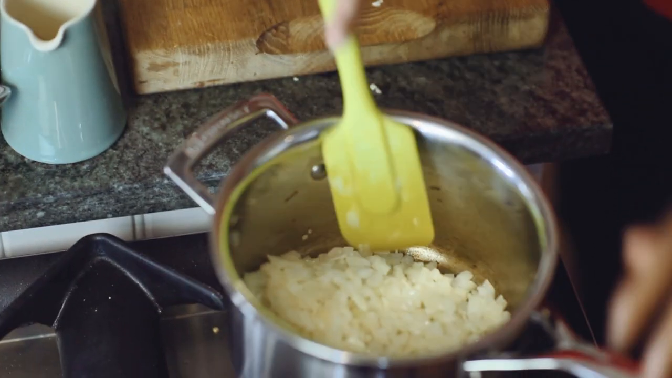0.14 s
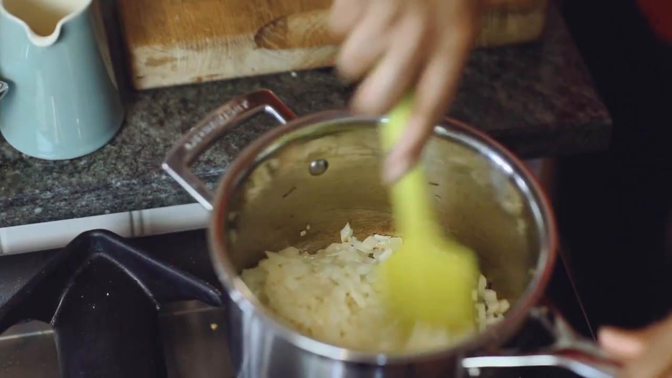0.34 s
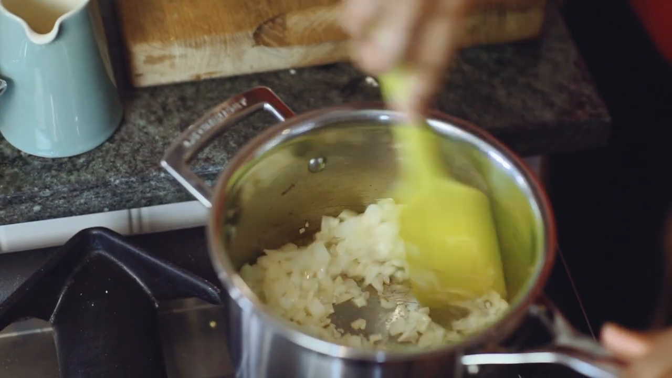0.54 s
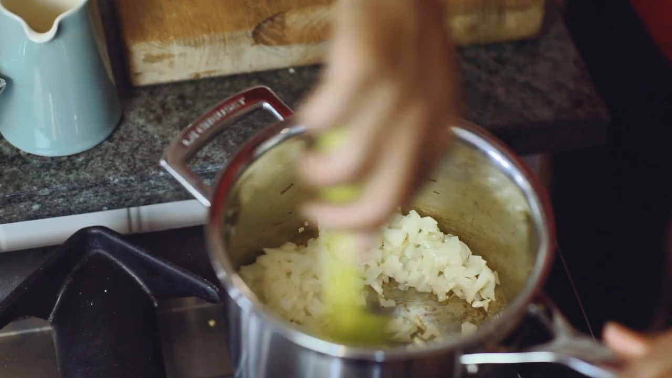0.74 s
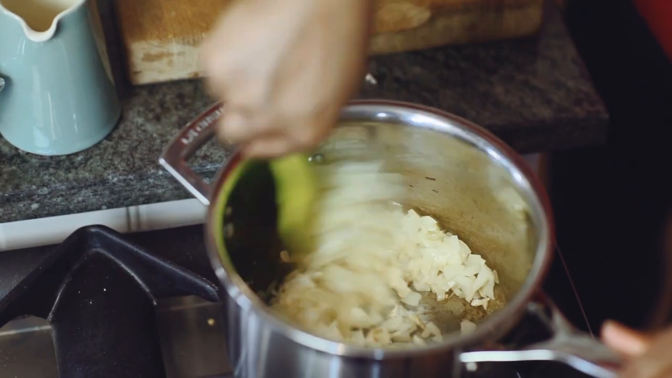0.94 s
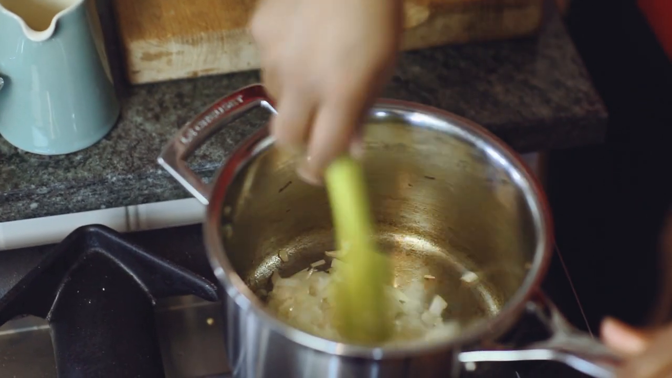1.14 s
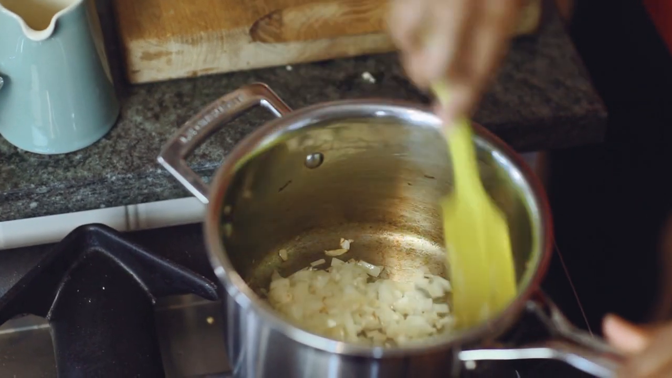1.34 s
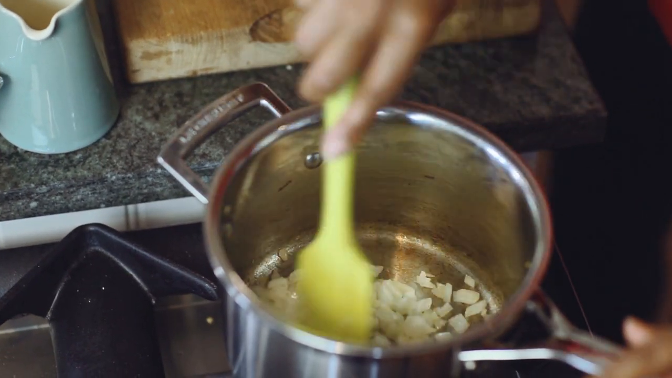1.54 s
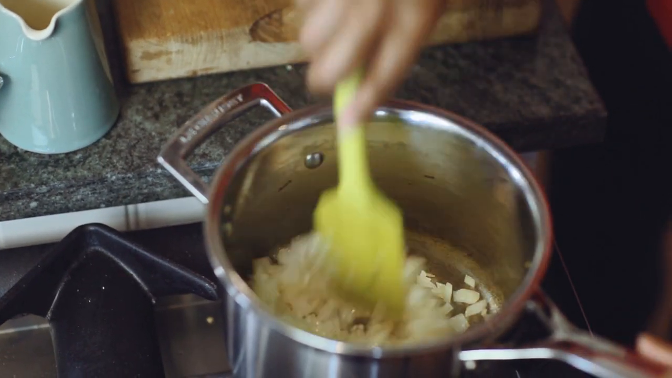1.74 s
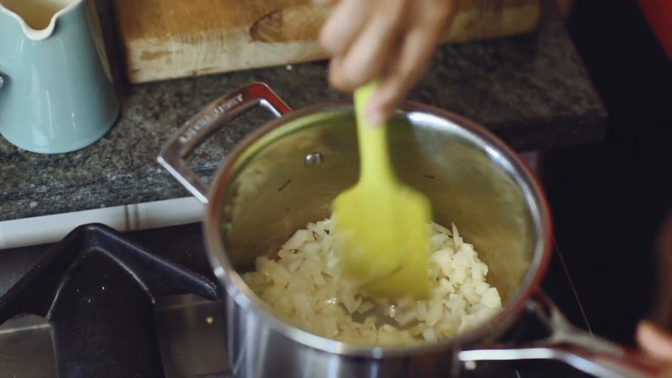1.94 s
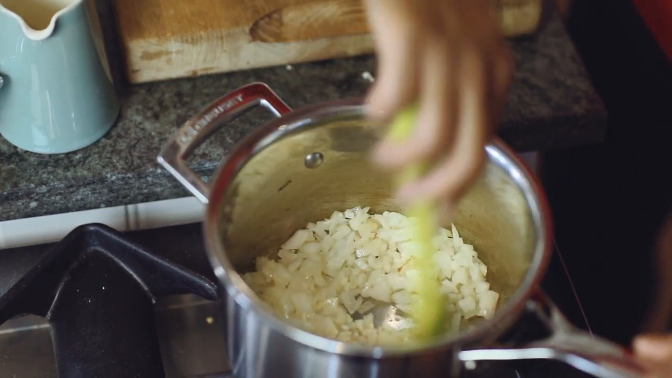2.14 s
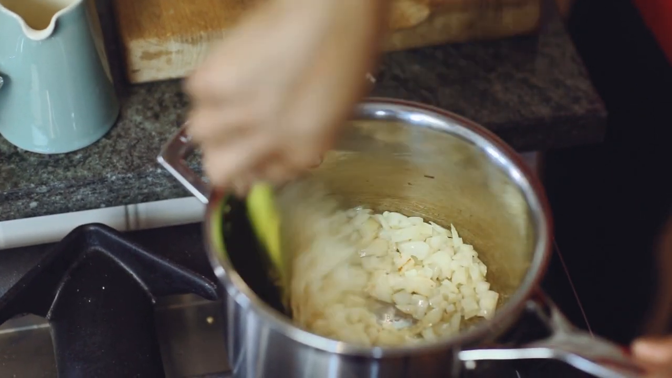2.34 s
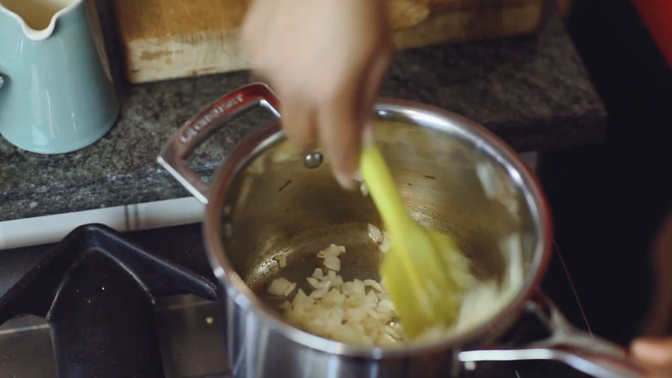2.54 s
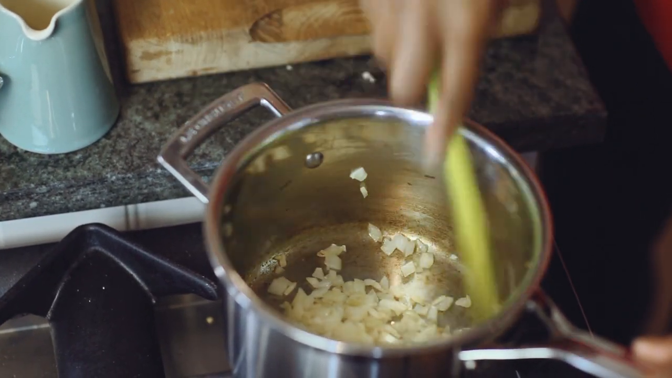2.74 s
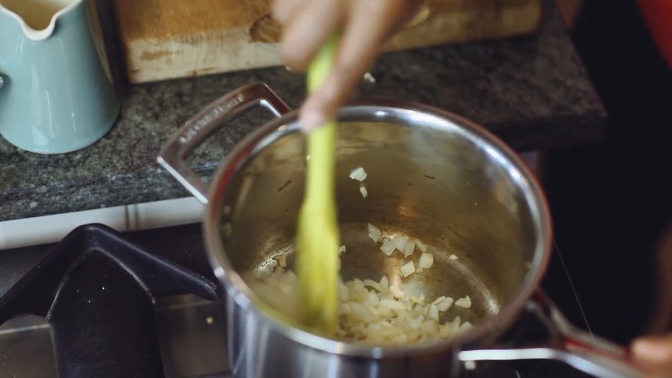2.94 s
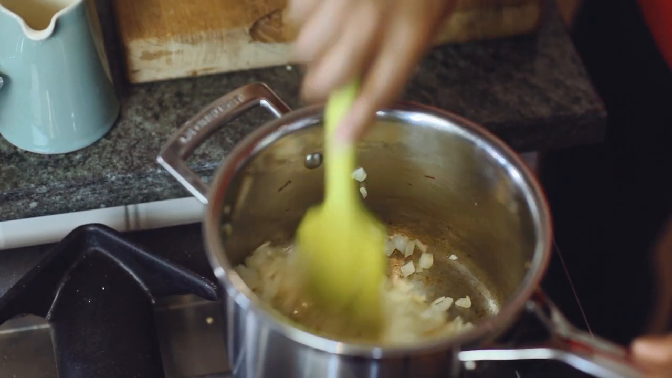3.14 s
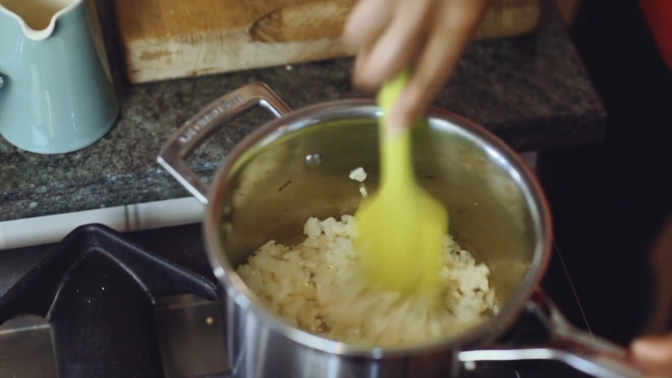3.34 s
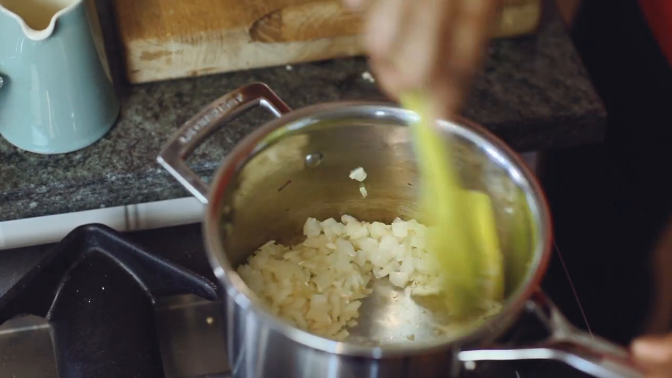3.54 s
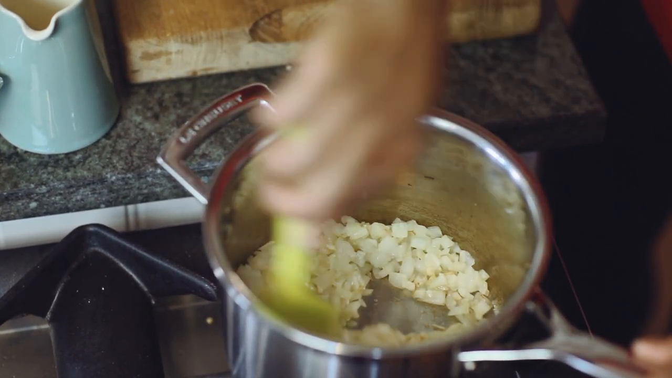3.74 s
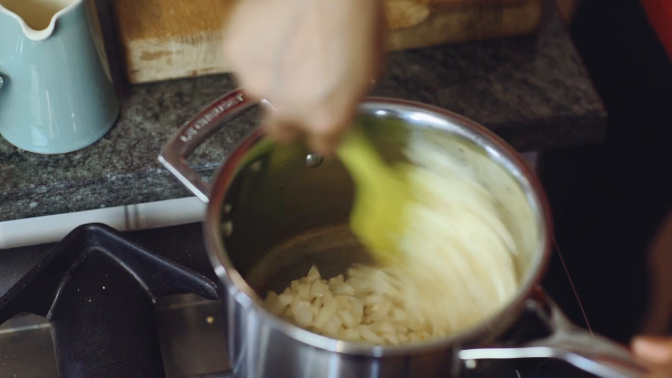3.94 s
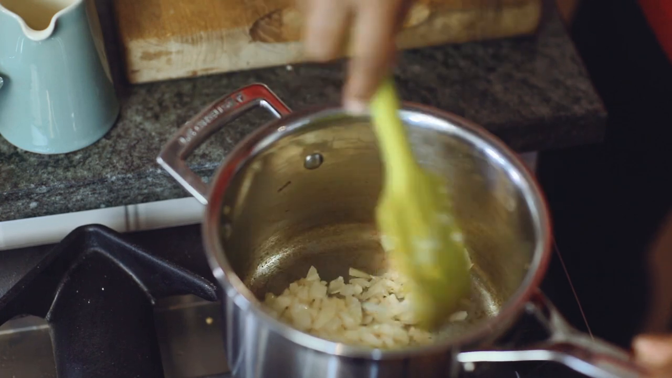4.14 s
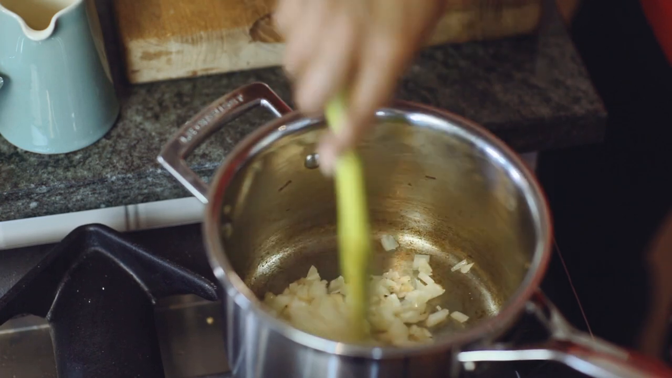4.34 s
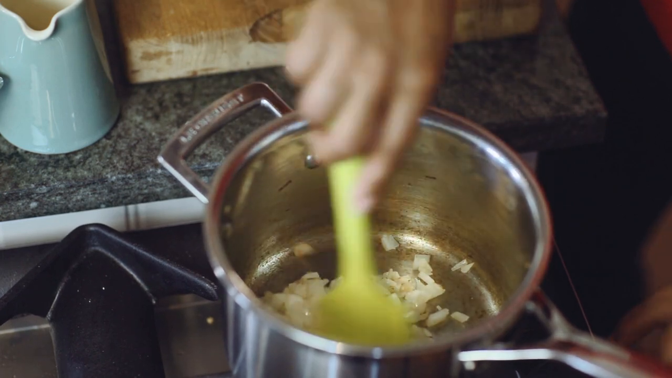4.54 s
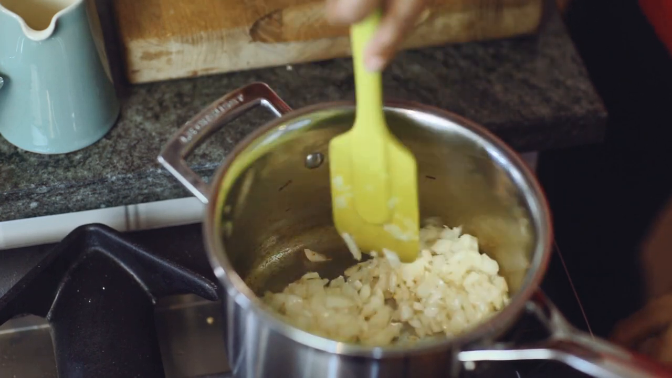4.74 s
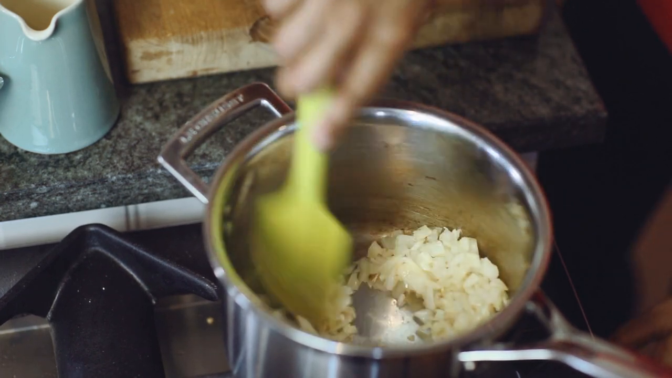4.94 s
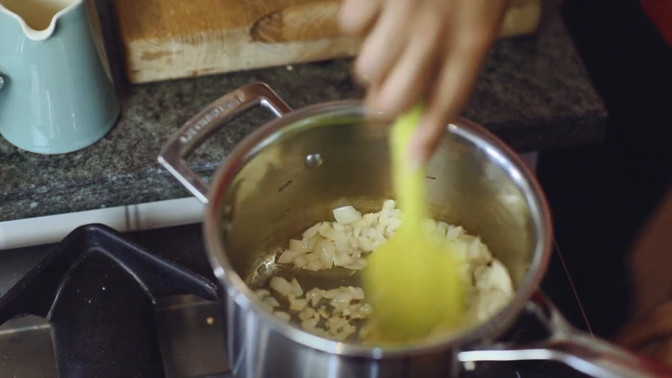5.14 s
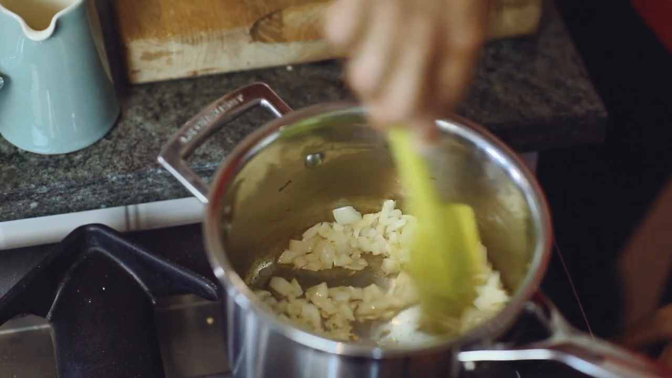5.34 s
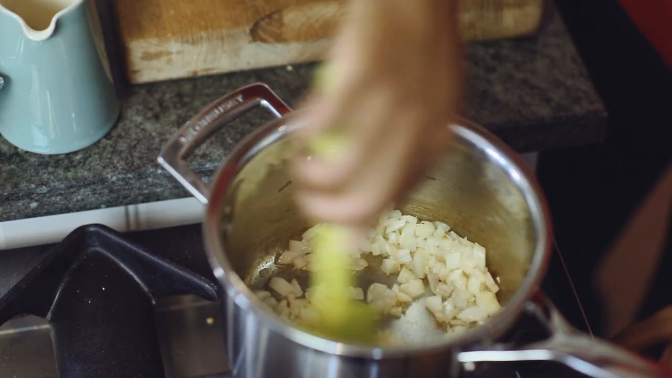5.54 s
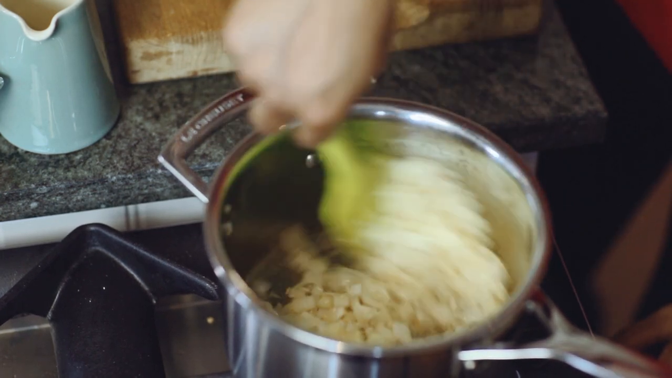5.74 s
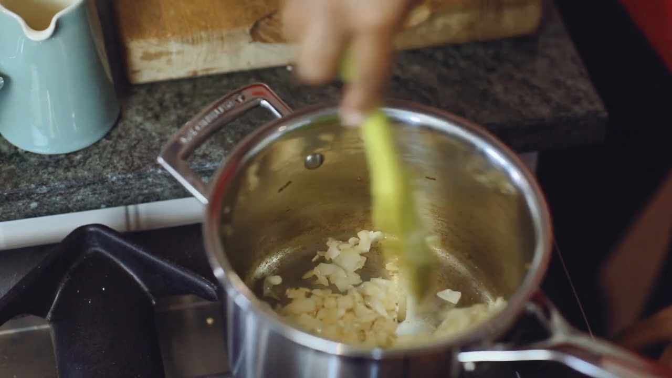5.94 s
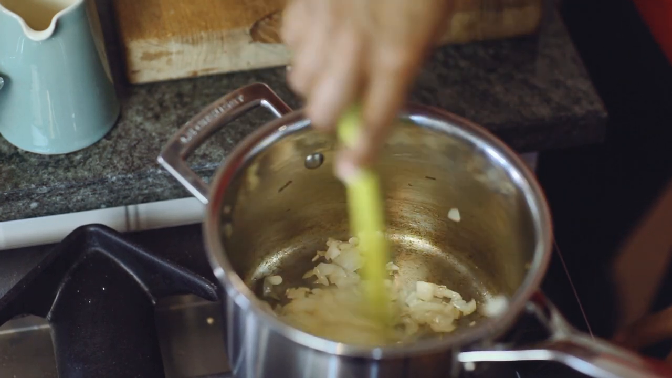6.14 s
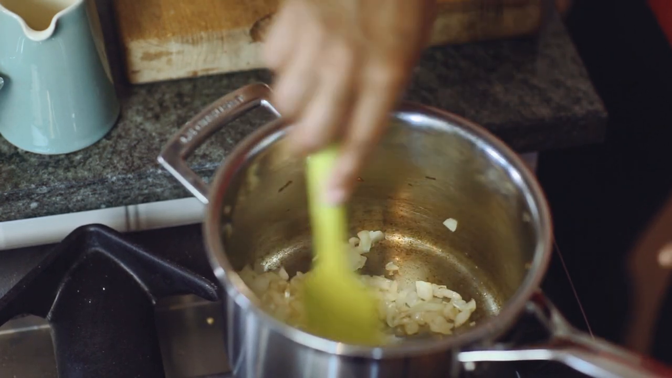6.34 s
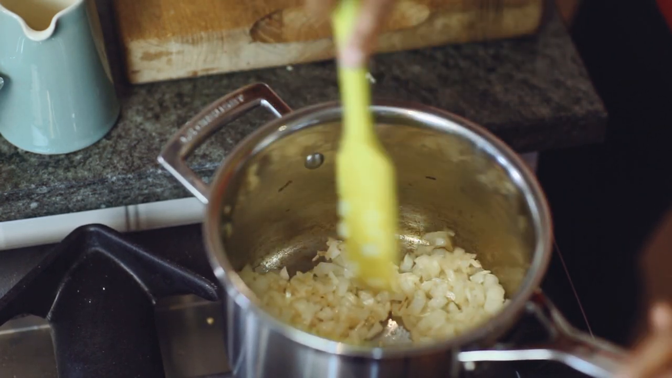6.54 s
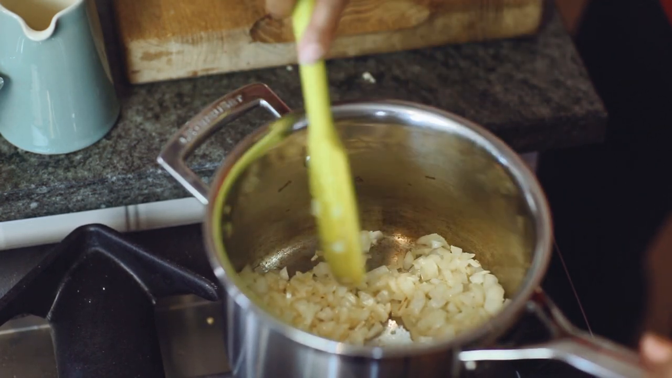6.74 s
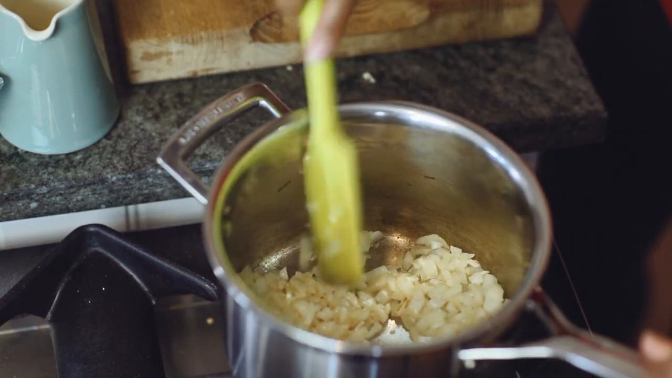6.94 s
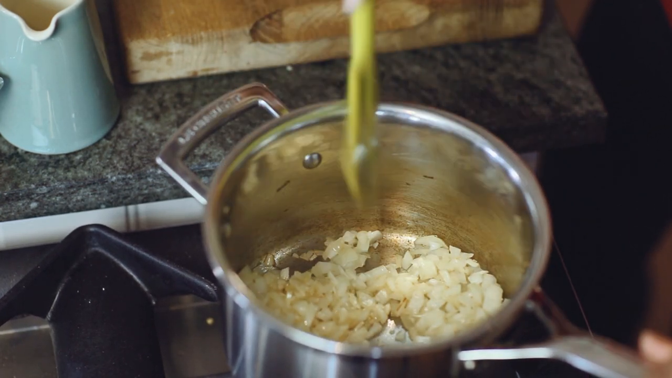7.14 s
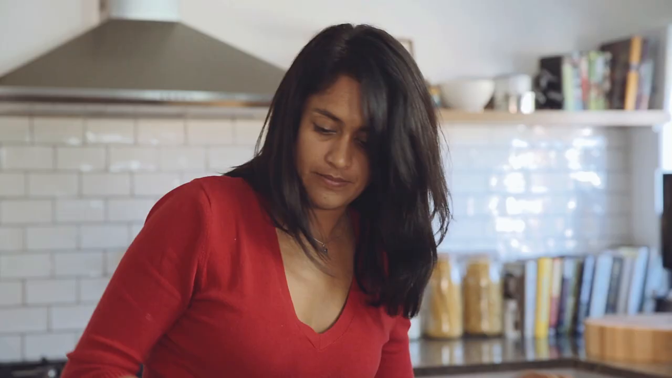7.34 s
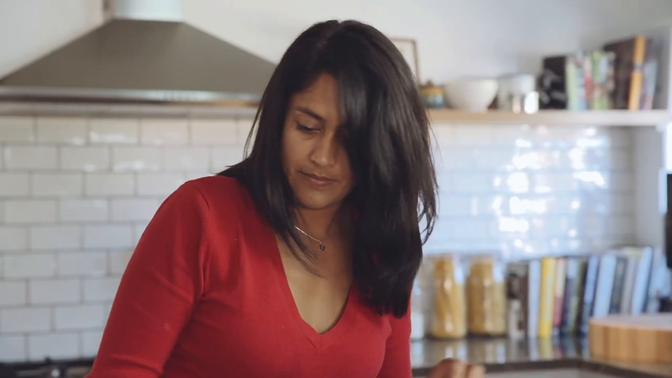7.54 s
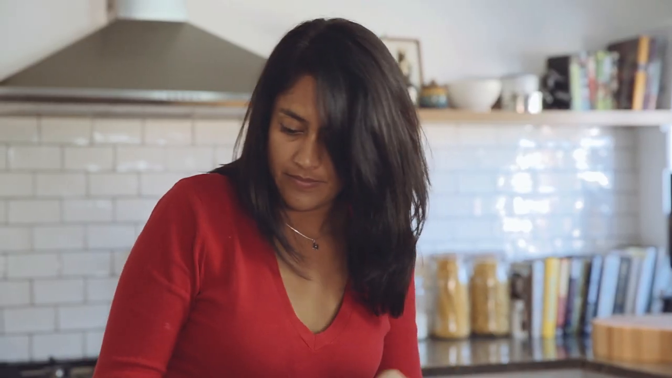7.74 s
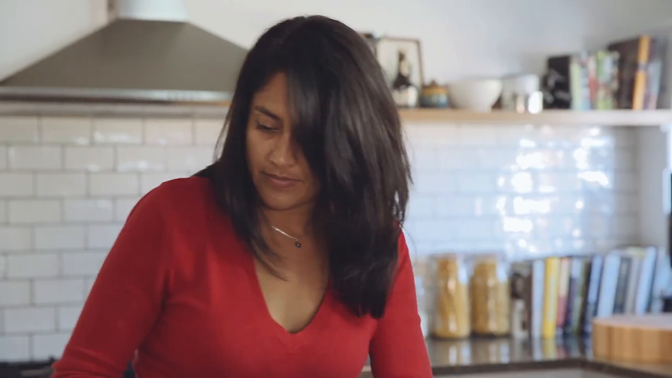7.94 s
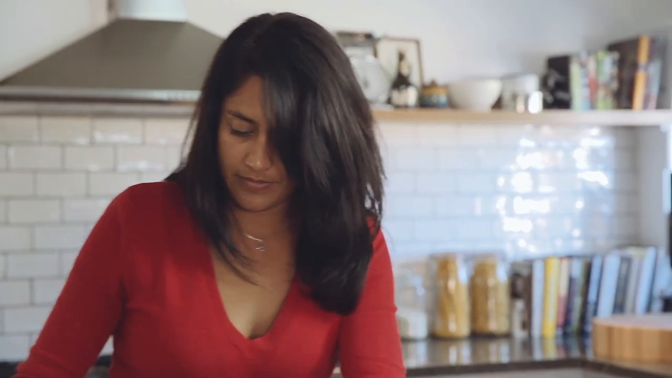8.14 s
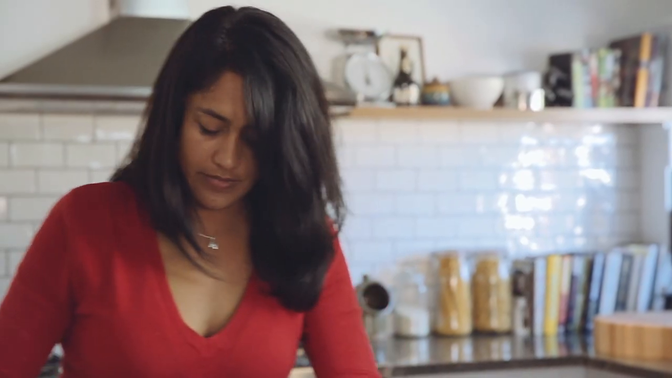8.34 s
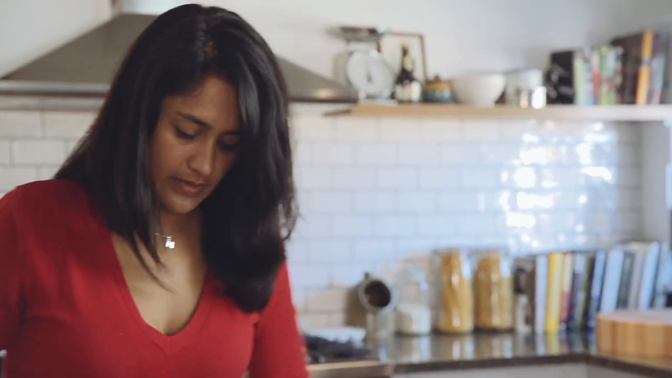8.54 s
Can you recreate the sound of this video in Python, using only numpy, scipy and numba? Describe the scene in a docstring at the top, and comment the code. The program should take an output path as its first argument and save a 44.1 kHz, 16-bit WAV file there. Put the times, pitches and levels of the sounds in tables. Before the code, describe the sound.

In a home kitchen, onions fry in oil in a deep steel saucepan. The sizzle swells quickly to a dense bright crackle, with sharp spits and soft, muffled spatula bumps on the pan. It gradually eases; near the end the spatula knocks the rim twice with a ringing metallic clatter, the frying fades and the spatula lands on the counter with a dull thud. Close single microphone, mono, faint low room air.

```python
"""In a kitchen, diced onions fry in oil in a deep steel saucepan, stirred with a soft spatula; one microphone.
Farthest back is the faint low air of the room and its dull reflections, made of shaped and fading noise.
The spatula bumps the pan, is knocked twice on its rim and laid on the counter: clicks set resonances ringing.
In front, steam bubbles burst in a dense sizzle of random clicks and noise, coloured by the hollow of the pan;
larger bubbles spit, each a short burst of bright noise with a dull puff."""
import sys
import numpy as np
from scipy import signal
from scipy.fft import rfft, irfft, next_fast_len
from scipy.io import wavfile
from numba import njit

SR = 44100
rng = np.random.default_rng(int(sys.argv[2]) if len(sys.argv) > 2 else 0)


def pcm_store(signal):
    """Save signal as 16-bit PCM."""
    levels = np.round(np.clip(np.atleast_2d(signal), -1, 1) * 32767)
    wavfile.write(sys.argv[1], SR, levels.astype(np.int16).T)


N = 383669   # samples, 8.7 s
SIZE = next_fast_len(N + SR)   # transform length, with room for one second of tail
HZ = np.maximum(np.arange(SIZE // 2 + 1) * SR / SIZE, 1)


def from_db(db):
    """Decibels to gain."""
    return 10 ** (np.asarray(db) / 20)


def rms_one(x):
    """Scales to rms 1."""
    return x / np.sqrt(np.mean(x ** 2) + 1e-20)


def in_time(rows):
    """Reads a (start_s, value) curve at every sample."""
    return np.interp(np.arange(N) / SR, *np.transpose(rows))


def colour(points):
    """Causal frequency response with the given magnitude in dB, by folding the cepstrum."""
    hz, db = np.transpose(points)
    log_gain = np.interp(np.log(HZ), np.log(hz), db) * np.log(10) / 20
    cepstrum = irfft(log_gain, SIZE)
    cepstrum[1:SIZE // 2] *= 2
    cepstrum[SIZE // 2 + 1:] = 0
    return np.exp(rfft(cepstrum))


def through(x, response):
    """Filters by a frequency response."""
    return irfft(rfft(x, SIZE) * response, SIZE)[:N]


def drift(rate_hz):
    """Slow random wander of rms 1: noise through two equal low-pass poles."""
    r = np.exp(-2 * np.pi * rate_hz / SR)
    wander = signal.lfilter([1], [1, -2 * r, r * r], rng.standard_normal(N + SR))
    return rms_one(wander[SR:])   # the first second lets the filter settle


def clicks(times, gains):
    """One sample at each time in seconds."""
    out = np.zeros(N)
    np.add.at(out, np.round(np.asarray(times) * SR).astype(int), gains)
    return out


def ring(x, hz, t60):
    """Damped resonance: a unit click sets a sine of height 1 ringing, down 60 dB after t60 seconds."""
    r, w = from_db(-60 / (t60 * SR)), 2 * np.pi * hz / SR
    return signal.lfilter([0, np.sin(w)], [1, -2 * r * np.cos(w), r * r], x + 1e-18)


@njit
def two_pole(x, pull, r):
    """Resonance whose centre may change at every sample."""
    y = np.zeros(len(x))
    for i in range(2, len(x)):
        y[i] = x[i] - x[i - 2] + pull[i] * y[i - 1] - r * r * y[i - 2]
    return y


# tone of the kitchen air: pitch_hz [Hz], level_db [dB per Hz, relative]
AIR_TONE = [(25, -27), (45, -14), (65, -1.5), (100, -6), (170, 1), (260, -10), (500, -19.5), (1500, -19.5)]
# loudness of the kitchen air at the microphone: start_s [s], level_db [dB rms]
AIR_LEVEL = [(0, -48.5), (0.4, -46.5), (4.8, -47), (6.0, -51), (8.7, -53)]


def kitchen_air():
    """The low noise of the room's air: random noise weighted to the bass, at a slowly changing level."""
    air = through(rng.standard_normal(N), colour(AIR_TONE))
    return from_db(in_time(AIR_LEVEL)) * rms_one(air)


KITCHEN_T60_S, KITCHEN_BUILD_S, KITCHEN_CUT_HZ = 0.42225, 0.01343, 1644


def kitchen_reflections(x):
    """Reflections off the room build up over some milliseconds and die away, dull."""
    t = np.arange(SR) / SR
    fading = rng.standard_normal(SR) * from_db(-60 * t / KITCHEN_T60_S)
    tail = fading * (1 - np.exp(-t / KITCHEN_BUILD_S))
    response = rfft(tail / np.linalg.norm(tail), SIZE)
    return through(x, response / (1 + 1j * HZ / KITCHEN_CUT_HZ))


# spatula laid on the counter, a single row: start_s [s], level_db [dB], tap pitch_hz [Hz], tap t60_s [s],
# low_hz and high_hz [Hz], the edges of the counter's thud
COUNTER_TAP = (7.817, -16, 1151.5, 0.0004, 245, 1099.5)


def laid_down():
    """One contact with the counter gives a very short tap and a band-limited dull thud."""
    s, level_db, tap_hz, t60, low_hz, high_hz = COUNTER_TAP
    contact = clicks([s], from_db(level_db))
    band = signal.butter(2, [low_hz, high_hz], "band", fs=SR, output="sos")
    return ring(contact, tap_hz, t60), signal.sosfilt(band, contact)


# spatula on pan wall, bottom and rim: start_s [s], level_db [dB], hardness_hz [Hz, softer contact = lower]
SPATULA_BLOWS = [(.2, -37.5, 280.5), (0.303, -36.5, 202), (.873, -38, 199.7), (0.934, -34.5, 280.1),
                 (1.148, -35.5, 199.7), (1.362, -37.5, 249.2), (2.367, -35, 250.6), (2.426, -44, 200),
                 (3.38, -36.5, 200), (3.6, -47.5, 500), (4.282, -38.5, 250.4), (5.036, -37, 400.3),
                 (6.678, -35.5, 502.7), (6.714, -30.5, 248.3), (6.842, -23, 700), (6.852, -30, 4990),
                 (6.985, -19, 700), (6.993, -26.5, 10050), (7.023, -28, 9040), (7.051, -31, 8010),
                 (7.167, -32.5, 249.3), (7.23, -47.5, 199.7)]
# ringing modes of the pan and its iron stand: pitch_hz [Hz], level_db [dB], t60_s [s]
PAN_MODES = [(90, -8, .25), (171, -2, 0.3), (224, -2, 0.27), (246, -4, 0.3), (327, -8, 0.35),
             (387, -6, 0.39), (454, -8, .25), (517, 6, 0.4), (550, -6, 0.2), (633, -10, 0.4),
             (860, -10, .3), (1022, -9, 0.3), (1093, -6.5, 0.36), (1180, -6, 0.3), (1298, -9, .25),
             (1375, 4, 0.2), (1440, 5, 0.22), (1550, -12, 0.2), (1814, -8, 0.2), (2275, -8, .12),
             (2700, -10, .08), (3150, 1, 0.11), (3720, -5, .08), (4330, -6, .08), (5110, 2, .12),
             (6024, -5, .08), (6800, -4, .08), (7600, -5, .07), (8253, -4, .08), (10200, -6, .06)]
PAN_LOW_HZ = 105   # the pan radiates little below this
LUCK_DB = 2.162   # spread of mode strength from blow to blow
CHATTER_PER_S, CHATTER_S = 2500, 0.032   # mean rate of touches on the stand, time constant of their dying
CHATTER_DB = -27   # chatter fed into the ringing
CLATTER_DB, CLATTER_DB_PER_OCTAVE = -5, 6.0   # bare clatter: level at 1 kHz, rise towards the treble
CLATTER_CYCLES = 30.0   # cycles of a mode in the clatter's t60


def pan():
    """A blow strikes every mode with a strength of its own, then the pan chatters on its stand:
    the touches feed the ringing and each clatters briefly in the same modes."""
    s, blow_db, hard_hz = np.transpose(SPATULA_BLOWS)
    luck_db = rng.normal(0, LUCK_DB, (len(SPATULA_BLOWS), len(PAN_MODES)))
    touches = rng.standard_normal(N) * (rng.random(N) < CHATTER_PER_S / SR)
    dying = [1, -np.exp(-1 / (CHATTER_S * SR))]
    out = 0
    for k, (hz, mode_db, t60) in enumerate(PAN_MODES):
        reach = 1 / (1 + (hz / hard_hz) ** 3)   # a soft contact misses the high modes
        blows = clicks(s, reach * from_db(blow_db + mode_db + luck_db[:, k]))
        chatter = touches * signal.lfilter([1], dying, blows + 1e-18)
        ringing = ring(blows + from_db(CHATTER_DB) * chatter, hz, t60)
        clatter_db = CLATTER_DB + CLATTER_DB_PER_OCTAVE * np.log2(hz / 1000)
        clatter = ring(from_db(clatter_db) * chatter, hz, CLATTER_CYCLES / hz)
        out = out + ringing + clatter
    radiated = signal.butter(3, PAN_LOW_HZ, "high", fs=SR, output="sos")
    return signal.sosfilt(radiated, out)


# tone of the frying as it leaves the pan, humps are resonances of the hollow: pitch_hz [Hz], level_db [dB per Hz]
HOLLOW_TONE = [(150, -32.5), (250, -19.5), (379, -17), (421, -15), (684, -10), (918, -17), (1210, -13),
               (1470, -6.5), (1900, -10.5), (2260, -5), (2840, -8.5), (3200, -5.5), (5880, 0.5),
               (15000, -16), (15800, -19.5)]


def pan_hollow():
    """The air in the deep pan colours what bursts inside it, as a frequency response."""
    return colour(HOLLOW_TONE)


# lone large bubbles: start_s [s], peak level_db [dB], body_db [dB, dull puff against the peak]
LARGE_BUBBLES = [(0.3204, -16.5, -21), (0.8044, -9.5, -20), (1.036, -6.5, -17), (1.0868, -3, -11),
                 (1.1368, -1, -15.5), (3.606, -0.5, -13.5), (4.0863, -8, -15.5), (4.3807, -11, -17.5),
                 (4.449, -4, -14.5), (4.543, -8, -17), (4.8234, -3, -15.5), (5.661, -14, -15.5),
                 (6.6343, -3.5, -18), (6.6456, -9.5, -18), (6.91, -4.5, -13), (6.9181, -1.5, -13.5),
                 (7.1334, -5, -16), (7.1874, -11.5, -15.5), (7.3086, -11, -20), (7.346, -6.5, -20),
                 (7.3808, -14, -19), (7.4613, -5.5, -17), (7.5208, -5, -16.5), (7.5885, -11.5, -23.5),
                 (7.7695, -10, -20), (7.7802, -11, -16.5), (7.9707, -15, -15), (8.0594, -16.5, -14.5),
                 (8.1523, -16.5, -12.5), (8.2792, -23, -5.5), (8.4744, -23, -12), (8.536, -17.5, -16),
                 (8.557, -11.5, -17.5)]


def spits(burst_s, body_hz):
    """Each large bubble bursts as about a millisecond of bright noise with a dull, short-lived puff."""
    s, peak_db, body_db = np.transpose(LARGE_BUBBLES)
    fade = np.exp(-np.arange(200) / (burst_s * SR))
    burst = np.convolve(clicks(s, 1), fade)[:N] * rng.standard_normal(N)
    bright = through(burst, pan_hollow())
    at = np.round(s * SR).astype(int)
    tops = np.array([np.abs(bright[i:i + 100]).max() for i in at])
    # each gain brings its spit to the listed peak and holds until the next one
    strength = np.repeat(from_db(peak_db) / tops, np.diff(np.append(at, N)))
    bright[at[0]:] *= strength
    puff = ring(clicks(s, from_db(peak_db + body_db)), body_hz, 0.002982)
    return bright + puff


# vigour of the frying, as level of the sizzle: start_s [s], level_db [dB rms]
FRYING_VIGOUR = [(0.0, -40), (0.24, -35), (0.31, -24), (0.46, -22), (0.6, -18.5), (0.7, -17.5),
                 (1.2, -18.5), (1.48, -17.5), (1.55, -20), (1.62, -18), (1.9, -17.5), (2.13, -18),
                 (2.69, -19.5), (2.98, -21), (3.08, -20), (3.27, -19.5), (3.97, -19.5), (4.12, -22.5),
                 (4.38, -22.5), (4.48, -24), (4.53, -21.5), (5.11, -21), (5.69, -22), (5.77, -21.5),
                 (5.99, -25), (6.2, -23), (6.35, -21), (6.83, -23), (7.17, -26), (7.56, -30.5),
                 (7.73, -31.5), (8.29, -36.5), (8.51, -38), (8.56, -34), (8.7, -39.5)]
# fine top hiss: start_s [s], level_db [dB against the sizzle]
TOP_HISS = [(0, -11), (0.6, -9), (1.5, -11.5), (2.5, -10), (4, -9), (5.6, -8.5), (6.6, -7.5), (7.2, -9),
            (7.75, -6.5), (8.25, -22.5), (8.7, -12.5)]
# narrow, wandering resonance of the frying near 1450 Hz, flaring briefly at times, once with a spit:
# start_s [s], pitch_hz [Hz], level_db [dB rms]
WANDERING_HUMP = [(0.2, 1492, -55.5), (0.22, 1449, -67.5), (0.29, 1465, -39), (0.42, 1349, -40.5),
                  (0.6, 1497, -40.5), (0.9, 1457, -49), (1.08, 1528, -30.5), (1.16, 1414, -41),
                  (1.67, 1536, -49.5), (1.71, 1500, -25), (1.82, 1402, -44.5), (1.91, 1440, -29.5),
                  (2.11, 1559, -43.5), (3.27, 1423, -48.5), (3.4, 1447, -31), (3.56, 1533, -43.5),
                  (4.76, 1444, -47.5), (4.83, 1533, -31.5), (4.85, 1454, -38.5), (5.66, 1517, -48.5),
                  (6.12, 1487, -37.5), (6.17, 1460, -61), (6.74, 1449, -38.5), (6.8, 1434, -47)]
HUMP_WIDTH_HZ, HUMP_FADE_DB_PER_S = 182.83, 11   # width of each of two passes; fade after the last row
FULL_DB = -20   # vigour at which the burst rate and the fizz level hold
FIZZ_DB, FIZZ_FOLLOWS = -37, 0.8748   # wet low fizz: level, share of the sizzle's swing in dB
BURSTS_FOLLOW = 0.4   # bursts thin out as the frying calms: dB of rate (20 log) per dB of vigour


def bubbling(per_s, spread_db, steam, clump_db):
    """Steam bubbles burst at random in uneven sizes over smooth steam, and swell together in clumps."""
    sizes_db = spread_db * np.minimum(rng.exponential(1, N), 5)
    sizes = from_db(sizes_db) * rng.choice([-1, 1], N)
    share = from_db(BURSTS_FOLLOW * (in_time(FRYING_VIGOUR) - FULL_DB))
    happens = rng.random(N) < per_s * share / SR
    bursts = rms_one(sizes * happens / np.sqrt(share))   # fewer bursts are taller, to hold the power
    clumps = 0.6351 * drift(15.974) + drift(143.16) + 0.8426 * drift(400)
    return (bursts + steam * rng.standard_normal(N)) * from_db(clump_db * clumps)


def wandering_resonance(source):
    """The bubbling excites a narrow resonance, two passes deep, whose pitch wanders."""
    s, hump_hz, _ = np.transpose(WANDERING_HUMP)
    r = np.exp(-np.pi * HUMP_WIDTH_HZ / SR)
    pull = 2 * r * np.cos(2 * np.pi * np.interp(np.arange(N) / SR, s, hump_hz) / SR)
    return two_pole(two_pole(source, pull, r), pull, r)


def sizzle(per_s, spread_db, steam, clump_db, patchy_db):
    """One bubbling feeds sizzle, low fizz, top hiss and wandering resonance; each swells on its own."""
    source = bubbling(per_s, spread_db, steam, clump_db)
    low = 1 / (1 + (HZ / 2000) ** 6)
    top = 1 / (1 + (10000 / HZ) ** 8)
    hollow, sizzle_db = pan_hollow(), in_time(FRYING_VIGOUR)
    fizz_db = FIZZ_DB + FIZZ_FOLLOWS * (sizzle_db - FULL_DB)
    s, _, hump_db = np.transpose(WANDERING_HUMP)
    t = np.arange(N) / SR
    flaring_db = np.interp(t, s, hump_db) - HUMP_FADE_DB_PER_S * np.maximum(t - s[-1], 0)
    layers = ((through(source, hollow * (1 - low - top)), sizzle_db),
              (through(source, hollow * low), fizz_db),
              (through(source, hollow * top), sizzle_db + in_time(TOP_HISS)),
              (wandering_resonance(source), flaring_db))
    return sum(from_db(level_db + patchy_db * drift(3.83)) * rms_one(x) for x, level_db in layers)


def scene():
    """Everything reaches the one microphone, which feeds both channels alike."""
    air = kitchen_air()
    tap, thud = laid_down()
    blows = pan()
    spit = spits(burst_s=0.000854, body_hz=906.6)
    fry = sizzle(per_s=6000, spread_db=3.0, steam=0.8638, clump_db=0.985, patchy_db=1.0352)
    # the thud is heard only by way of the room
    echo = kitchen_reflections(from_db(-9) * blows + from_db(34) * thud + from_db(-15) * spit)
    return np.tile(fry + spit + blows + tap + echo + air, (2, 1))


CUTOFF_HZ = 15720


def record(dry):
    """The microphone's chain rounds the peaks and cuts the treble steeply above the cutoff."""
    rounded = 1.2 * np.tanh(dry / 1.2)
    top_cut = signal.ellip(10, .3, 80, CUTOFF_HZ, fs=SR, output="sos")   # 0.3 dB ripple, 80 dB down
    return signal.sosfilt(top_cut, rounded)


dry = scene()
out = record(dry)
pcm_store(out)
```